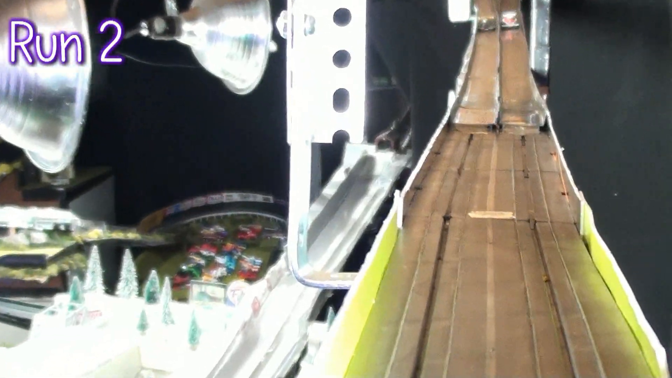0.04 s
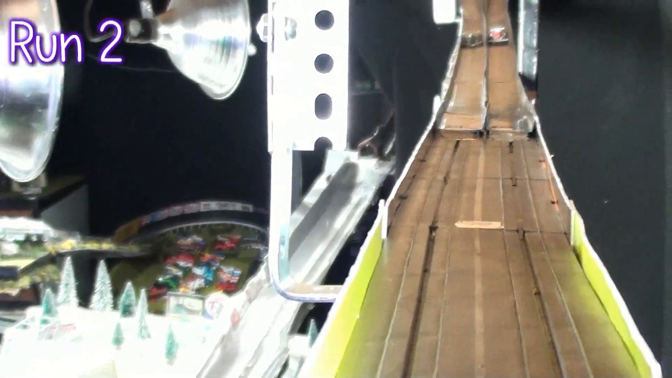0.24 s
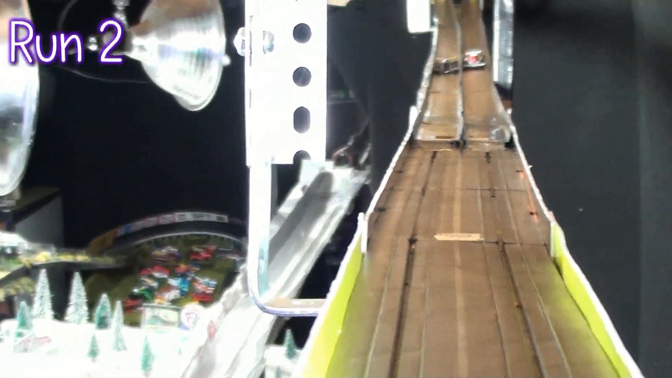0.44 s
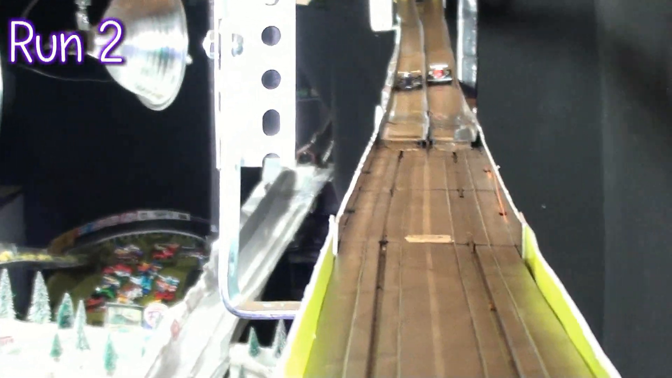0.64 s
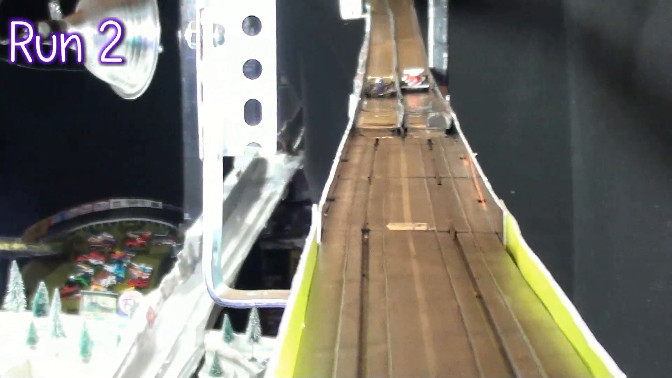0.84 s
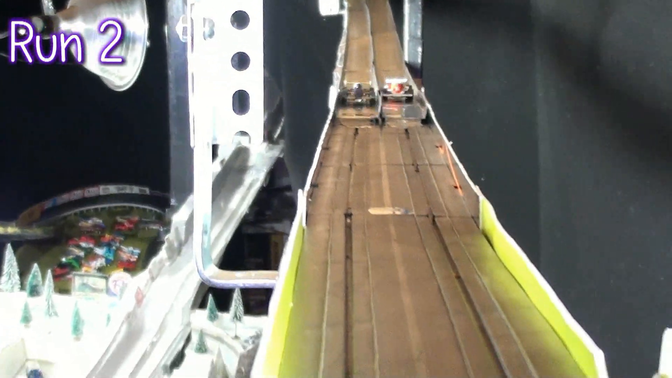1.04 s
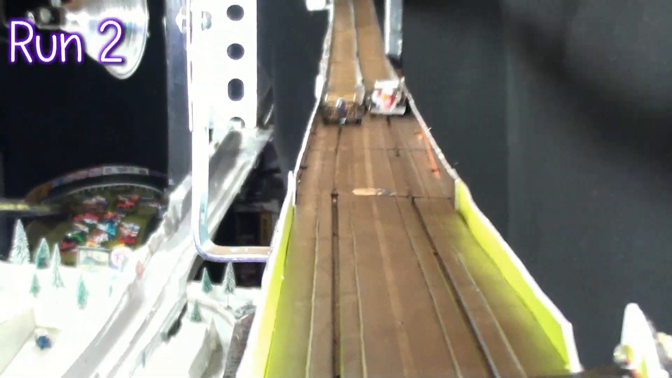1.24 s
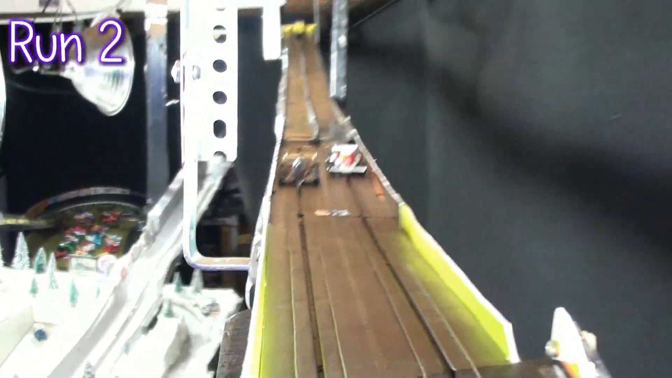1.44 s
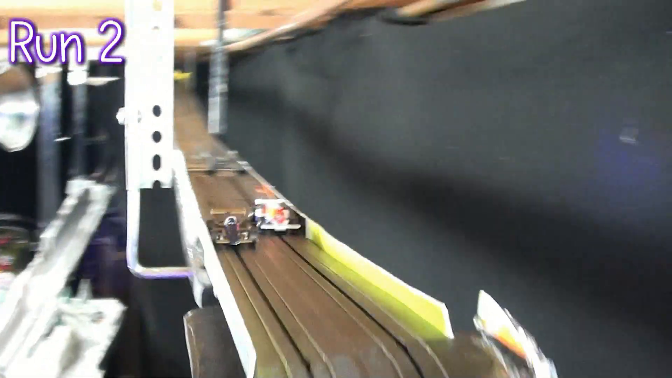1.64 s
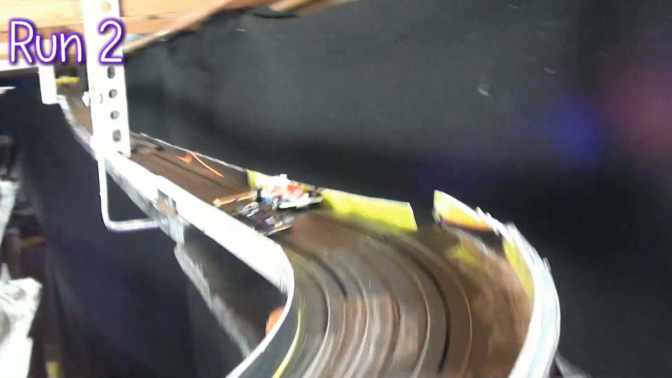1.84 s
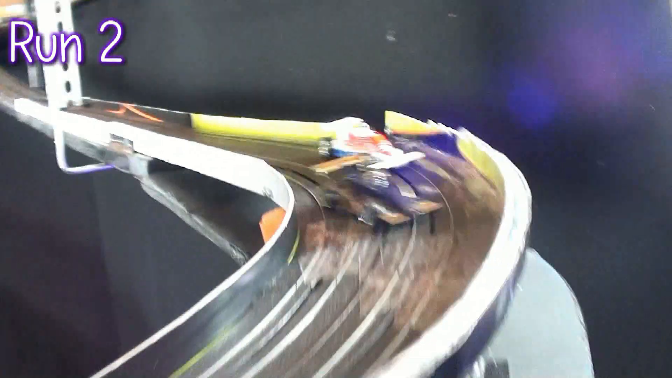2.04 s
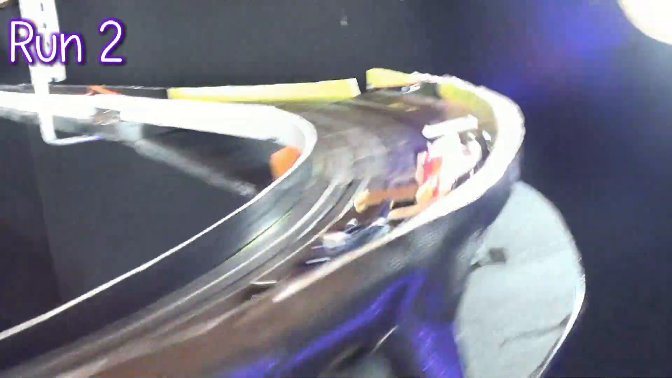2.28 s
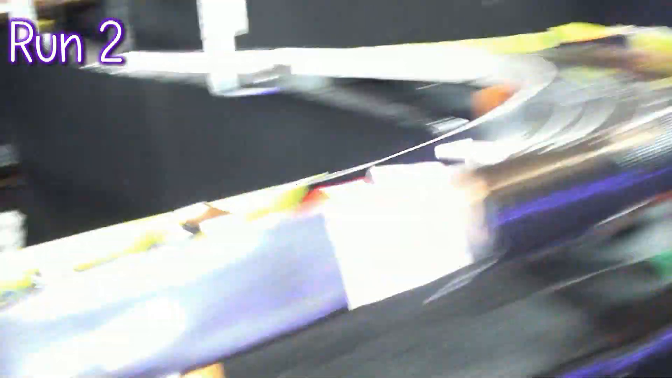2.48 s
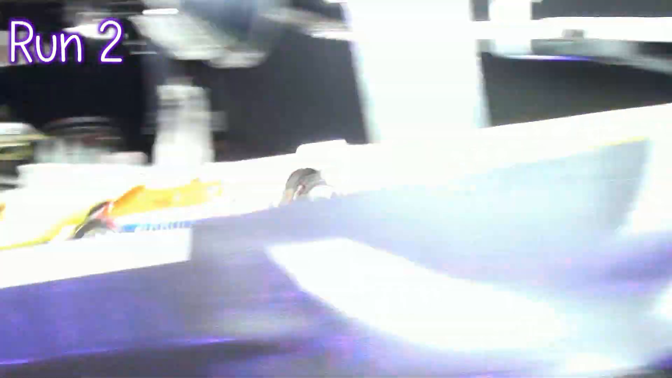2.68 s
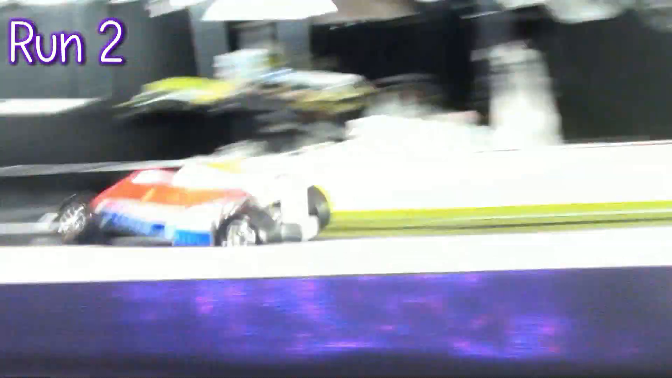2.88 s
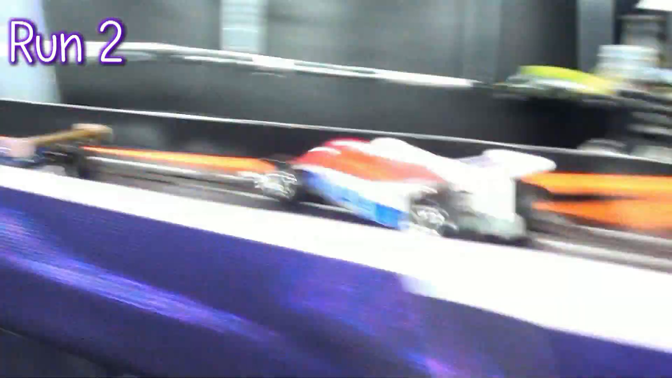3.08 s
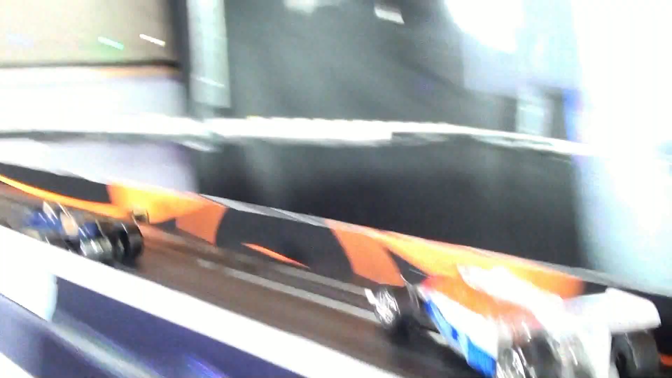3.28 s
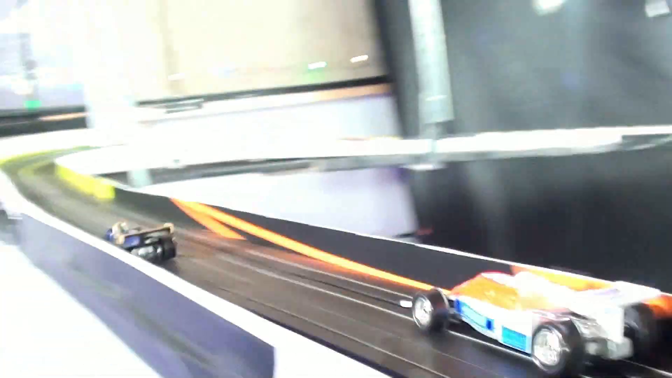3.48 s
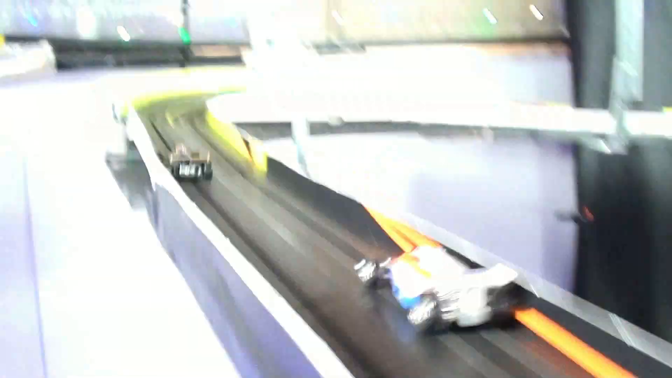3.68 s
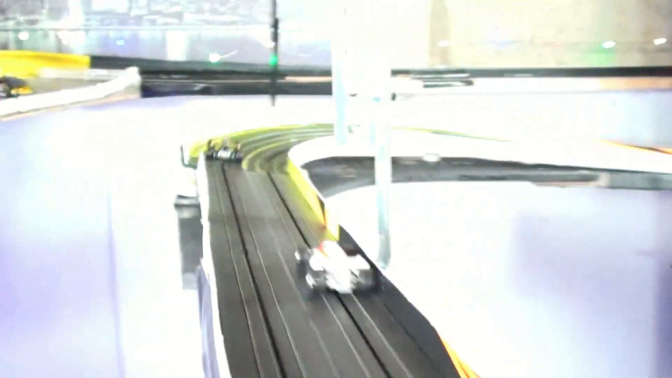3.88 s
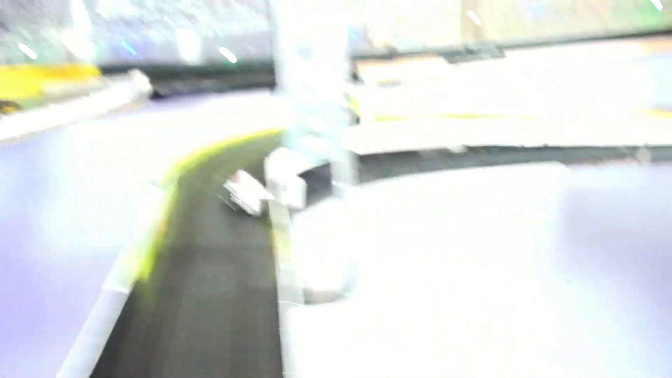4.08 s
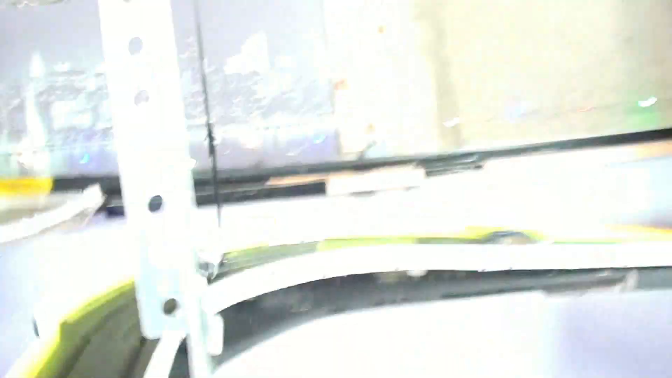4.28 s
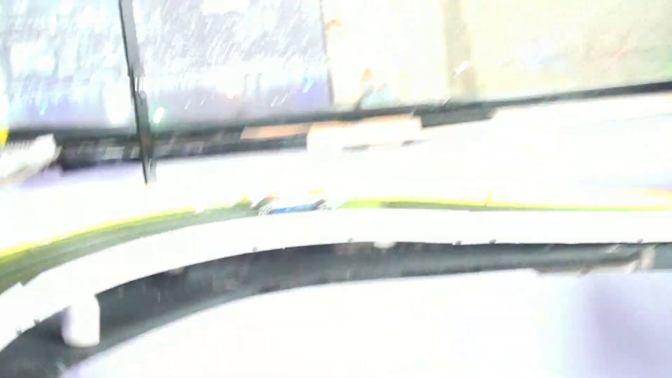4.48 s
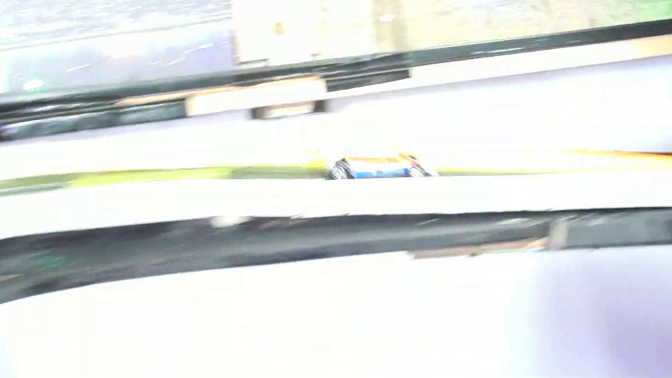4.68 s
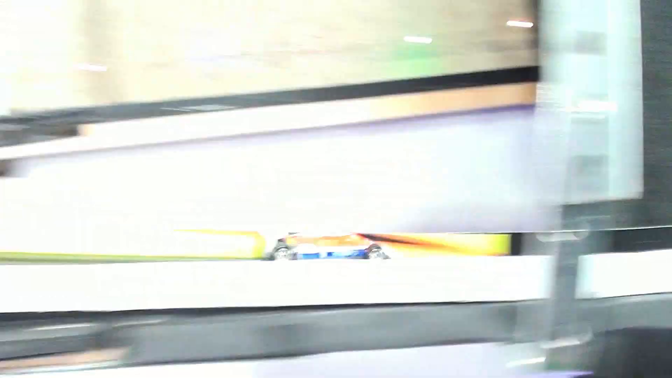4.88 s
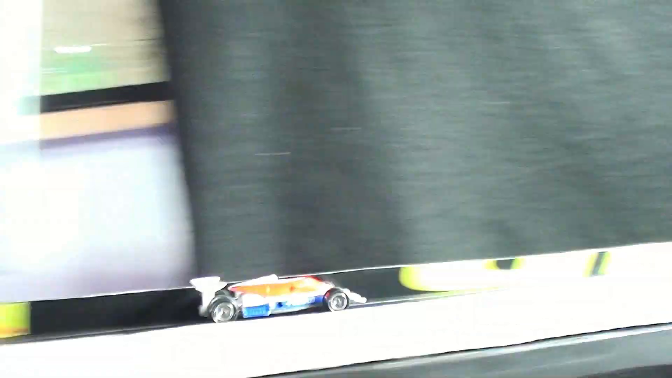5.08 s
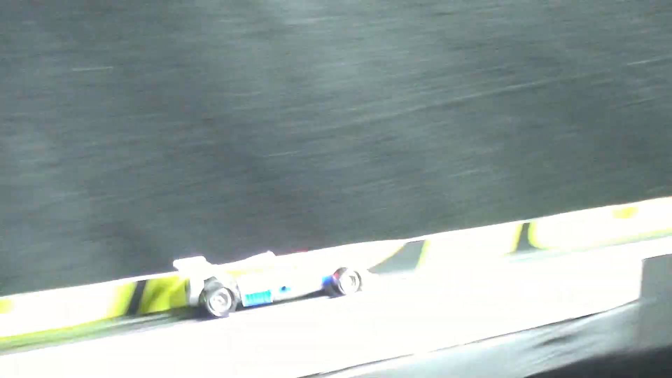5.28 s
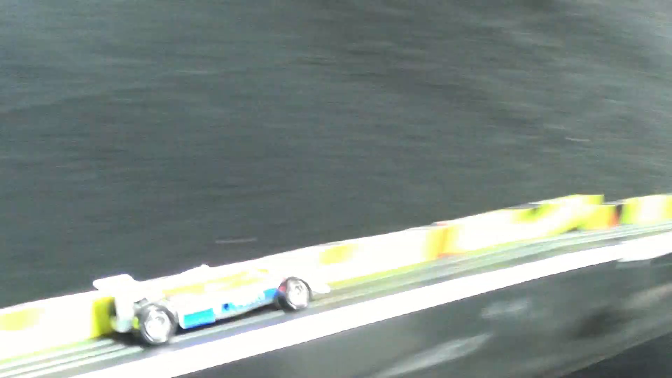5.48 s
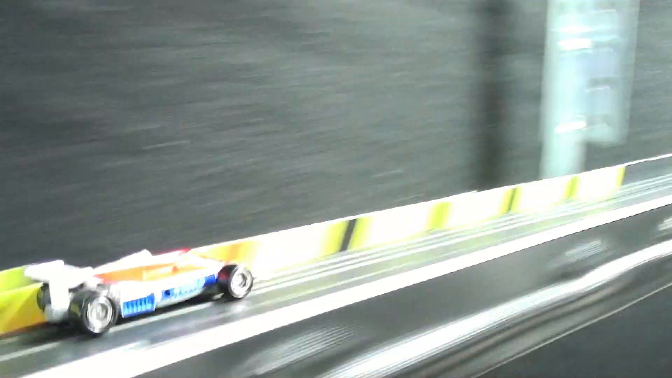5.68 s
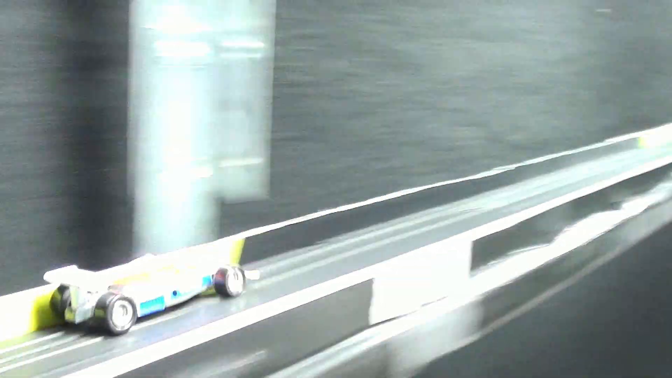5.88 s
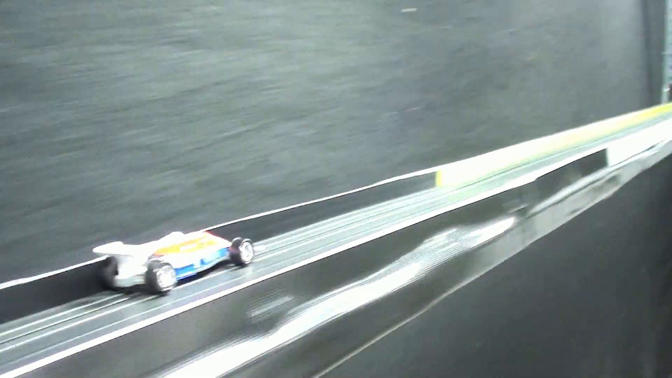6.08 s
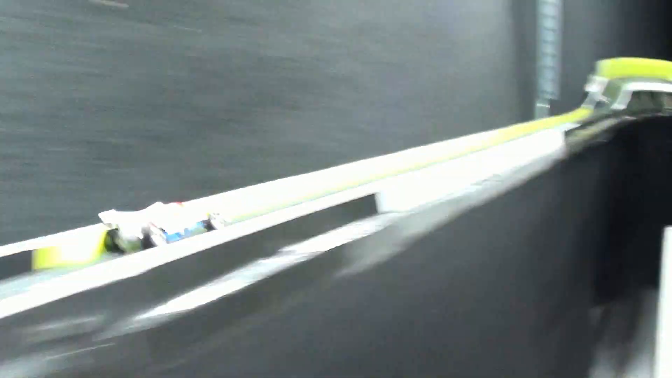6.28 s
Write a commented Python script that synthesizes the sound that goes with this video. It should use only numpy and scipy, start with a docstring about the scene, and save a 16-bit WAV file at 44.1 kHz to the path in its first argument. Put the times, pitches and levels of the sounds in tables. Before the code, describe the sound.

Two die-cast toy cars roll down a long plastic track in a small room with a low fan hum. Faint at first, the wheels swell into a close, hollow hiss with rattling axles. A flurry of sharp clacks comes in the first bend, then the rolling carries on with a few dull thuds and scattered clicks. The microphones follow close behind, in stereo.

```python
"""Two die-cast toy cars run down a long plastic track indoors, followed closely by two microphones.
Tiny bumps under the hard wheels ring each stretch of track. Loose axles rattle, most in the first bend,
where the cars clack against the rails. The track thuds on its supports and its frame grumbles,
over the low hum of a small room with a fan."""
import sys
import numpy as np
from scipy import signal
from scipy.fft import rfft, irfft, next_fast_len
from scipy.io import wavfile
from scipy.ndimage import uniform_filter1d

SR = 44100
rng = np.random.default_rng(int(sys.argv[2]) if len(sys.argv) > 2 else 0)


def transcribe(u):
    """Save the signal u as a 16-bit wav file named by the first command-line argument.

    u: samples, shape (n,) or (channels, n), limited to [-1, 1]; the rate is SR.
    q: integer samples, one column per channel.
    """
    v = np.clip(np.atleast_2d(u).T, -1, 1)
    q = np.round(v * 32767).astype(np.int16)
    wavfile.write(sys.argv[1], SR, q)


N = 279153
T = np.arange(N) / SR


def undb(db):
    """Decibels to gain."""
    return 10 ** (np.asarray(db) / 20)


def unit(x):
    """Scale to rms 1."""
    return x / np.sqrt(np.mean(x ** 2))


def curve(rows):
    """Interpolate (s, value) rows at every sample."""
    return np.interp(T, *np.transpose(rows))


def band(x, lo_hz, hi_hz, order=3):
    """Butterworth band-pass."""
    return signal.sosfilt(signal.butter(order, [lo_hz, hi_hz], "band", fs=SR, output="sos"), x)


def colour(x, points):
    """Filter by a spectrum of (Hz, dB) points."""
    hz, db = np.transpose(points)
    size = next_fast_len(len(x))
    bins_hz = np.maximum(np.arange(size // 2 + 1) * SR / size, 1)
    gain = undb(np.interp(np.log(bins_hz), np.log(hz), db))
    return irfft(rfft(x, size) * gain, size)[:len(x)]


def ring(x, modes):
    """Drive parallel (Hz, width Hz, dB) resonances of alternating sign."""
    return sum((-1) ** k * undb(db) * signal.lfilter(*signal.iirpeak(hz, hz / width_hz, fs=SR), x)
               for k, (hz, width_hz, db) in enumerate(modes))


def walk(rate_hz):
    """Smooth random drift, rms 1."""
    step = int(SR / rate_hz)
    stairs = np.repeat(rng.standard_normal(N // step + 2), step)
    return unit(uniform_filter1d(stairs, step)[:N])


def impacts(per_s, spread_db):
    """Tiny blows of random time, sign and size."""
    hit = rng.random(N) < per_s / SR
    sign = np.sign(rng.standard_normal(N))
    return hit * sign * undb(spread_db * np.clip(rng.standard_normal(N), -2, 2))


def reflections(t60_s, delay_s=0.0045):
    """Room response: dense echoes that arrive late and decay together; unit energy."""
    t = T[:SR // 2]
    echoes = rng.standard_normal(len(t)) * np.exp(-np.log(1000) * t / t60_s) * (t > delay_s)
    return echoes / np.sqrt(np.sum(echoes ** 2))


# Room rumble. Each row: time in seconds, level in dB.
ROOM_LEVEL = [(0, -50), (1.6, -49.5), (2.2, -53.5), (3.1, -54), (3.8, -52.5), (4.4, -50.5), (5.2, -59.5),
              (6.3, -61)]
# Each row: frequency in Hz, gain in dB.
ROOM_SPECTRUM = [(15, -66), (25, -50), (41, -22), (130, 0), (178, 1.5), (265, -15.5), (302, -8.5),
                 (489, -15.5), (589, -13.5), (623, -16.5), (750, -12.5), (980, -34), (1650, -120)]
# Each row: frequency in Hz, initial rms level in dB, fade time in seconds.
FAN_TONES = [(376, -67, 8.7), (827, -61.5, 1.8)]


def room_hum(swell_db=1, waver_hz=5):
    """Air rumble and wavering fan tones, which fade as the fan is left behind."""
    level_db = curve(ROOM_LEVEL)
    air = unit(colour(rng.standard_normal(N), ROOM_SPECTRUM)) * undb(level_db + swell_db * walk(6.7))
    fan = 0
    for hz, db, fade_s in FAN_TONES:
        phase = 2 * np.pi * np.cumsum(hz + waver_hz * walk(16)) / SR
        fan += undb(db) * np.exp(-(T / fade_s) ** 4) * np.sqrt(2) * np.sin(phase)
    return air + fan * undb(level_db - level_db[0])


# Each row: time in seconds, level in dB.
HANDLING_LEVEL = [(0, -56), (1.5, -62.5), (2.4, -59), (3.3, -91), (4.2, -65), (5.5, -59), (6.3, -59)]


def handling():
    """Carrying the microphones makes a soft, low rumble."""
    rumble = band(rng.standard_normal(N), 85, 101, order=1)
    return undb(curve(HANDLING_LEVEL)) * unit(band(rumble, 25, 150, order=2))


# Each row: time in seconds, level in dB.
FRAME_LEVEL = [(0, -55), (1.2, -58.5), (1.35, -48), (1.65, -56), (2.15, -56), (2.35, -49.5), (2.55, -55.5),
               (2.75, -46.5), (3.0, -52.5), (3.7, -51.5), (3.97, -61), (4.15, -52), (4.75, -53), (5.1, -51),
               (5.6, -54), (5.9, -48), (6.15, -55), (6.33, -47.5)]


def frame_grumble():
    """The frame under the track grumbles faintly."""
    return undb(curve(FRAME_LEVEL)) * unit(band(impacts(2000, 3.7), 140, 625, order=2))


# Each row: start in seconds, level in dB, pitch in Hz.
THUDS = [(2.719, -42, 348), (3.34, -33.5, 288), (3.40, -34.5, 240), (3.468, -37.5, 184), (3.541, -39, 135),
         (4.22, -39, 95), (4.279, -37, 188), (4.375, -36, 275), (5.771, -32.5, 204)]


def support_thuds(attack_s=0.0047, t60_s=0.11, overtone_ratio=1.45, overtone_db=-4):
    """The cars' weight bumps the track on its supports, which answer with two dull modes."""
    out, t = np.zeros(N + SR), T[:SR // 3]
    envelope = (1 - np.exp(-t / attack_s)) * np.exp(-np.log(1000) * t / t60_s)
    for start_s, db, hz in THUDS:
        phase = 2 * np.pi * hz * t
        modes = np.sin(phase) + undb(overtone_db) * np.sin(overtone_ratio * phase)
        start = int(start_s * SR)
        out[start:start + len(t)] += undb(db) * modes * envelope
    return out[:N]


# Each row: frequency in Hz, width in Hz, gain in dB.
RAMP_MODES = [(1934, 100, -4), (2460, 340, -6), (3100, 430, -3), (3620, 670, -6.5)]
# Each row: time in seconds, level in dB.
RAMP_RING_LEVEL = [(0, -69), (.95, -44.5), (1.25, -52), (1.5, -32), (1.9, -28.5), (2.1, -56), (2.4, -82)]


def ramp_ring():
    """The wheels excite narrow resonances of the ramp and its run-out."""
    modes = ring(impacts(5000, 3.6), RAMP_MODES)
    return undb(curve(RAMP_RING_LEVEL)) * unit(ring(modes, [(2400, 3700, 0)]))


# Each row: time in seconds, level in dB.
WHISTLE_LEVEL = [(0, -63), (.4, -63), (.7, -62), (1.0, -54.5), (1.3, -80), (1.6, -94)]


def axle_whistle(hz=6280, width_hz=260):
    """A dry axle whistles thinly."""
    return undb(curve(WHISTLE_LEVEL)) * unit(ring(impacts(5500, 1.6), [(hz, width_hz, 0)]))


def rail_scrape(middle_s=3.37, half_s=0.083, hz=12450, width_hz=1300, level_db=-45):
    """The nearest car brushes the rail: a brief, thin sizzle of stick and slip."""
    mode = [(hz, width_hz, 0)]
    sizzle = unit(ring(ring(impacts(2500, 4), mode), mode))
    return undb(level_db) * np.exp(-((T - middle_s) / half_s) ** 4) * sizzle


# Each row: middle in seconds, half-length in seconds, frequency in Hz, width in Hz, level in dB.
SPANS = [(0.414, 0.066, 2090, 600, -49), (1.1, 0.16, 1970, 130, -51), (1.505, 0.15, 3680, 800, -29),
         (1.76, 0.31, 2150, 398, -33), (1.83, 0.095, 2860, 1010, -34), (1.9, 0.24, 4200, 1000, -32),
         (2.437, 0.037, 1160, 400, -38), (2.58, 0.1, 2920, 800, -34), (2.75, 0.13, 1080, 350, -38.5),
         (2.93, 0.17, 3000, 1400, -33), (3.177, 0.21, 1180, 398, -30.5), (3.244, 0.11, 2770, 600, -30),
         (3.75, 0.076, 3100, 600, -27.5), (3.775, 0.097, 1800, 500, -36), (4.017, 0.025, 1860, 500, -31),
         (4.23, 0.06, 1900, 250, -26.5), (4.254, 0.058, 1030, 298, -30), (5.15, 0.26, 2950, 596, -34.5),
         (5.153, 0.087, 1230, 300, -33), (5.207, 0.035, 1570, 220, -36), (5.36, 0.081, 1870, 450, -30.5),
         (5.55, 0.09, 1550, 200, -32.5), (5.57, 0.043, 4470, 700, -33), (5.6, 0.05, 2920, 400, -30),
         (5.608, 0.052, 1140, 298, -32), (5.812, 0.09, 2780, 300, -37), (6.064, 0.08, 1520, 200, -34),
         (6.143, 0.036, 1040, 160, -38.5), (6.296, 0.09, 1000, 180, -33)]


def hollow_spans():
    """Each hollow span of track rings in its own mode, most when the wheels are at its middle."""
    bumps = impacts(9000, 1.1)
    out = 0
    for middle_s, half_s, hz, width_hz, db in SPANS:
        mode = ring(ring(bumps, [(hz, width_hz, 0)]), [(hz, 2 * width_hz, 0)])
        out += undb(db) * np.exp(-((T - middle_s) / half_s) ** 2) * unit(mode)
    return out


# Metal body and axles. Each row: frequency in Hz, width in Hz, gain in dB.
CAR_MODES = [(1900, 3500, -1), (3690, 1210, 13.5), (5700, 770, 13), (6290, 930, 13.5), (8150, 3000, 3.5),
             (10980, 2500, 1), (12100, 1770, 0), (14300, 1200, 1)]


def struck_car_modes(spread_db=2.2, detune=0.025, width_ratio=0.89):
    """Each blow meets the body at another point, which shifts and reweights its modes."""
    draws = np.clip(rng.standard_normal((len(CAR_MODES), 2)), -2, 2)
    return [(hz * (1 + detune * shift), width_hz * width_ratio, db + spread_db * weight)
            for (hz, width_hz, db), (shift, weight) in zip(CAR_MODES, draws)]


# Each row: start in seconds, rms level during contact in dB, contact time in seconds, treble gain in dB.
CLACKS = [(0.3545, -51, 0.004, 12), (0.391, -48, 0.016, 3), (0.425, -52, 0.013, 4),
          (0.7495, -40.5, 0.006, 10), (0.782, -44, 0.006, -10), (0.8175, -36, 0.002, -4),
          (0.822, -42, 0.008, 9), (1.1306, -50, 0.01, 12), (1.2715, -33, 0.011, 2), (1.294, -39, 0.006, -5),
          (1.3099, -25.5, 0.0085, -4), (1.3253, -27.5, 0.002, 3), (1.336, -29.5, 0.0062, -5),
          (1.427, -28, 0.007, -9), (1.736, -23.5, 0.003, -12), (1.746, -27, 0.003, -12),
          (2.0434, -29.5, 0.0026, -3), (2.0825, -31, 0.008, 4), (2.145, -30, 0.0027, 1),
          (2.154, -29, 0.0016, 2), (2.1702, -30, 0.005, -1), (2.183, -26, 0.0042, 6),
          (2.191, -28.5, 0.007, -3), (2.2045, -35, 0.003, 1), (2.2164, -26.5, 0.0046, 2),
          (2.225, -29, 0.004, -3), (2.233, -25, 0.0022, 5), (2.2452, -27, 0.0035, 0),
          (2.2656, -24.5, 0.0024, 1), (2.2767, -28.5, 0.009, 5), (2.295, -24.5, 0.0045, 2),
          (2.307, -31, 0.004, -9), (2.3235, -28.5, 0.011, -5), (2.3473, -25.5, 0.01, -3),
          (2.375, -26, 0.0069, -8), (2.387, -27.5, 0.01, 0), (2.401, -32, 0.007, -9),
          (2.417, -27.5, 0.0058, -2), (2.4273, -26, 0.012, 0), (2.446, -27.5, 0.0091, -5),
          (2.4584, -27.5, 0.01, -2), (2.4692, -24.5, 0.008, -2), (2.4955, -28.5, 0.0033, -14),
          (2.5073, -27.5, 0.0097, -8), (2.524, -27.5, 0.0071, -9), (4.338, -26, 0.003, -6),
          (4.369, -26, 0.005, -1), (4.39, -30, 0.004, -1), (4.408, -31, 0.002, 1), (4.6315, -30, 0.003, -3),
          (4.859, -30, 0.004, -2), (4.922, -28, 0.002, -2)]


def clacks(tick_db=11, attack_s=0.00023, sag_s=0.03, release_s=0.0012, ring_db=-15, ring_s=0.0097):
    """The cars hit joints, rails and each other: a tick, a judder while touching, then a faint ring."""
    out, t = np.zeros(N + SR), T[:SR // 8]
    lead = SR // 100  # room for the filter's pre-ring
    for start_s, db, contact_s, treble_db in CLACKS:
        press = np.exp(-t / sag_s - np.maximum(t - contact_s, 0) / release_s)
        envelope = (press + undb(ring_db) * np.exp(-t / ring_s)) * (1 - np.exp(-t / attack_s))
        judder = rng.standard_normal(len(t)) * envelope
        judder[0] += undb(tick_db)
        body = ring(np.pad(judder, (lead, 0)), struck_car_modes())
        track_spectrum = [(450, -3), (1300, 5), (3600, -1.5), (12500, treble_db), (15500, treble_db - 11)]
        hit = colour(body, track_spectrum)
        start, touch = int(start_s * SR) - lead, int(contact_s * SR)
        out[start:start + len(hit)] += undb(db) * hit / np.std(hit[lead:lead + touch])
    return out[:N]


# Each row: landing in seconds, air time in seconds.
SKIPS = [(1.728, 0.024), (2.375, 0.011), (2.4955, 0.0071), (4.713, 0.031), (5.268, 0.018)]


def wheel_lift_db(skip_db=-7, hop_db=-2, hop_s=0.013, hard_clack_db=-30.5, landing_s=0.0015):
    """The rolling dips while the wheels are in the air: in skips, and in a hop before each hard clack."""
    hops = [(land_s, hop_s, hop_db) for land_s, db, _, _ in CLACKS if db > hard_clack_db]
    skips = [(land_s, air_s, skip_db) for land_s, air_s in SKIPS]
    dip_db = np.zeros(N)
    for land_s, air_s, depth_db in hops + skips:
        land, air = int(land_s * SR), int(air_s * SR)
        dip_db[land - air:land] += depth_db * np.sqrt(np.arange(air) / air)
    return uniform_filter1d(dip_db, int(landing_s * SR))


def wheel_contact(bounce_s=0.004, flutter_db=1.08, bend_db=2, bend_s=2.08, bend_half_s=0.12,
                  wobble_db=0.5, turn_hz=57):
    """Gain from wheel pressure: bounces, harder at the first bend's rail, a wobble each turn, and lifts."""
    bounces = signal.lfilter([1], [1, -np.exp(-1 / (bounce_s * SR))], np.abs(impacts(130, 1.0)))
    in_bend = np.exp(-((T - bend_s) / bend_half_s) ** 2)
    bounce_db = (flutter_db + bend_db * in_bend) * unit(bounces - bounces.mean())
    turn_phase = 2 * np.pi * np.cumsum(turn_hz * (1 + 0.157 * walk(4.1))) / SR
    return undb(bounce_db + wobble_db * np.sin(turn_phase) + wheel_lift_db())


# Spectra of the stretches of track. Each row: frequency in Hz, relative gain in dB.
RAMP = [(350, -37), (600, -22), (845, -10.5), (1100, -11), (1600, -5), (1950, -4), (2100, -5),
        (3240, -11.5), (4330, -12), (6430, -18), (14000, -25.5)]
OPEN_DECK = [(350, -55), (600, -41), (725, -33), (887, -30), (1060, -26), (1190, -7.5), (1360, -8),
             (1520, -0.5), (1960, -2), (2600, -2), (3410, 0), (5390, -5), (7750, -5.5), (8990, -11),
             (15000, -25.5)]
FIRST_BEND = [(350, -49), (600, -10), (802, -35), (1090, -5), (1220, 6), (1390, 4), (2770, 7), (3460, 6.5),
              (5070, 4), (6780, 4.5), (14000, -13.5)]
MIDDLE_STRAIGHT = [(350, -55), (600, -25), (765, -6), (852, -30), (1130, -1.5), (1290, -12), (1440, 3),
                   (1690, 0), (2980, 2.5), (4120, 0), (4460, 0), (7650, -8.5), (12400, -24.5), (15000, -34)]
BEND_APPROACH = [(350, -57), (600, -23.5), (765, -15), (840, -23), (1040, -10), (1180, -10), (1350, -7),
                 (1910, -4), (2500, -7), (3190, -7), (4970, -10), (7450, -16), (15000, -34)]
SECOND_BEND = [(350, -59), (600, -27), (1000, -4), (1090, -12), (1180, -4), (1290, -11), (1520, 1),
               (1760, -3.5), (1910, 1), (2500, -7.5), (3700, -6), (7250, -9), (15000, -32)]
BEND_EXIT = [(350, -38), (600, -13), (807, -26), (1230, -7.5), (1460, -3.5), (1520, -3.5), (2040, -1),
             (2500, -8.5), (4340, -5.5), (7860, -10), (15000, -31)]
BACK_STRAIGHT = [(350, -33), (600, -20), (796, -19), (1400, -2), (1670, 0), (2020, 1.5), (2400, -4.5),
                 (3800, -1), (5460, -7), (7750, -8), (15000, -34)]
LAST_STRAIGHT = [(350, -59), (600, -24), (687, -52), (988, -4), (1290, -1.5), (1520, 4.5), (2070, 2),
                 (2370, -3.5), (2860, 3), (3650, -2), (4340, -1), (4970, -3.5), (7450, -4.5), (9110, -12),
                 (15000, -40)]
# Each row: arrival in seconds, spectrum, rattle offset in dB, axle ticks per second, boom offset in dB.
ROUTE = [(0, RAMP, -25, 500, -7.5), (0.72, RAMP, -2, 590, -6), (0.87, RAMP, -24, 500, -17),
         (1.13, RAMP, -4, 420, -36), (1.27, OPEN_DECK, -14, 1000, -16.5), (1.85, OPEN_DECK, -3, 700, -17),
         (2.052, FIRST_BEND, 1.5, 430, -19), (2.26, FIRST_BEND, -5, 300, -9.5),
         (2.52, MIDDLE_STRAIGHT, -6.5, 1000, -18.5), (3.32, MIDDLE_STRAIGHT, -4, 1000, -13.5),
         (3.52, BEND_APPROACH, -6.5, 760, -23), (3.98, SECOND_BEND, -8.5, 720, -17),
         (4.34, BEND_EXIT, -5, 570, -13.5), (4.6, BACK_STRAIGHT, -29, 720, -20.5),
         (5.06, LAST_STRAIGHT, -17, 2300, -15.5), (5.28, LAST_STRAIGHT, -5.5, 1300, -16),
         (5.55, LAST_STRAIGHT, -4.5, 1600, -11), (5.92, LAST_STRAIGHT, -2, 1700, -15.5)]
ARRIVALS_S, TRACK_SPECTRA, RATTLE_DB, TICKS_PER_S, BOOM_DB = zip(*ROUTE)


def along_route(values, blend_s=0.097):
    """One value per stretch of track, blended as the cars cross the joints."""
    stretch = np.searchsorted(ARRIVALS_S[1:], T)
    return uniform_filter1d(np.array(values, float)[stretch], int(blend_s * SR))


def floor_boom(wheel_db, hz=1000, width_hz=420, waver_db=0.9):
    """The track floor flexes in its lowest mode, more on slack stretches, wavering between supports."""
    level_db = wheel_db + along_route(BOOM_DB) + waver_db * walk(9)
    mode = ring(impacts(3000, 7.5), [(hz, width_hz, 0)])
    return undb(level_db) * unit(band(mode, 715, 1630))


def rattle_gain(wheel_db, shake_db=-15.5, settle_s=0.093):
    """The rattle follows the rolling; each clack shakes the axles, which then settle."""
    shaken = np.zeros(N)
    for start_s, db, _, _ in CLACKS:
        start = int(start_s * SR)
        flare = undb(db + shake_db) * np.exp(-T[:N - start] / settle_s)
        shaken[start:] = np.maximum(shaken[start:], flare)
    return np.hypot(undb(wheel_db + along_route(RATTLE_DB)), shaken)


def axle_rattle(wheel_db, scrape_t60_s=0.0078, scrape_db=7):
    """Loose axles tick in their slots; each tick scrapes briefly and rings the car."""
    per_s = along_route(TICKS_PER_S)
    ticks = impacts(per_s, 3.5) / np.sqrt(per_s)
    decay = np.exp(-2 * np.log(1000) / (scrape_t60_s * SR))
    energy = signal.lfilter([1], [1, -decay], ticks ** 2 + 1e-18)
    scrape = np.sqrt(energy) * rng.standard_normal(N)
    body = ring(unit(ticks) + undb(scrape_db) * unit(scrape), CAR_MODES)
    return rattle_gain(wheel_db) * unit(band(body, 6670, 11100, order=2))


# Wheels heard from close behind. Each row: time in seconds, level in dB.
CHASE_LEVEL = [(1.44, -31.5), (1.87, -30), (2.12, -33.5), (2.22, -36), (2.5, -37), (2.56, -30.5),
               (3.21, -24.5), (3.48, -28.5), (3.69, -26), (4.29, -27.5), (4.38, -32), (5.08, -29),
               (6.11, -29.5), (6.33, -29)]


def wheel_level_db(start_db=-53.5, rise_db_per_s=6, deck_s=1.262, deck_step=0.26, swell_s=0.26):
    """The cars grow louder as they speed up and near on the ramp, then swell quickly onto the deck."""
    ramp_db = start_db + rise_db_per_s * T
    close = (T > deck_s) * np.clip(deck_step + (T - deck_s) / swell_s, 0, 1)
    return (1 - close) * ramp_db + close * curve(CHASE_LEVEL)


def rolling(bumps_per_s=11000, drift_db=3.5, drift_hz=22, mode_q=42):
    """Bumps under the wheels ring the current stretch; its modes swell and fade as the contact moves."""
    bumps = impacts(bumps_per_s, 3)
    drive = bumps.copy()
    for hz in np.geomspace(1050, 13000, num=30):
        swell = undb(drift_db * np.clip(walk(drift_hz), -2, 2)) - 1
        drive += swell * ring(bumps, [(hz, hz / mode_q, 0)])
    out = 0
    for k, spectrum in enumerate(TRACK_SPECTRA):
        share = along_route(np.arange(len(ROUTE)) == k, blend_s=0.12)
        panel = colour(drive, spectrum)
        out += share * panel / np.std(band(panel[:SR], 1070, 3750))
    return out


# Reflections that differ between the microphones. Each row: frequency in Hz, side gain in dB.
SIDE_SPECTRUM = [(60, -30), (130, -32), (250, -22), (500, -17.5), (1000, -21), (2000, -15), (4500, -15),
                 (8500, -16.5), (11000, -100)]
# Direction of the cars. Each row: time in seconds, leftward bias in dB before band weighting.
PAN = [(0.0, 2.5), (2.03, 1), (2.36, 4), (2.92, 5), (3.28, -3), (3.79, -2.5), (4.3, 5.5), (4.64, 3.5),
       (6.33, 6.5)]


def scene(roll_db=1.0, spans_db=-0.2, walls_db=-18):
    """The cars near the microphones, with soft reflections from the room; stereo."""
    wheel_db = wheel_level_db()
    wheels = undb(roll_db + wheel_db) * rolling() + axle_rattle(wheel_db)
    cars = (wheels + undb(spans_db) * hollow_spans()) * wheel_contact()
    cars += floor_boom(wheel_db) + frame_grumble() + ramp_ring() + axle_whistle()
    cars += rail_scrape() + clacks() + support_thuds()
    walls = signal.fftconvolve(band(cars, 100, 8200, order=1), reflections(t60_s=0.075))[:N]
    mid = cars + undb(walls_db) * walls + room_hum() + handling()
    side = colour(signal.fftconvolve(mid, reflections(t60_s=0.14))[:N], SIDE_SPECTRUM)
    # direction is heard mainly from 1 to 7 kHz
    directional = colour(cars, [(300, -42), (1000, -16), (7000, -7.5), (11000, -36)])
    side += (undb(curve(PAN) / 2) - 1) * directional
    return np.array([mid + side, mid - side])


def record(dry, ceiling=0.18, release_db_per_s=250, cutoff_hz=15700):
    """Instant-attack peak limiter, then a steep low-pass."""
    over_db = np.maximum(20 * np.log10(np.abs(dry).max(axis=0) / ceiling + 1e-9), 0)
    duck_db = np.maximum.accumulate(over_db + release_db_per_s * T) - release_db_per_s * T
    low_pass = signal.ellip(12, .2, 100, cutoff_hz, fs=SR, output="sos")
    return signal.sosfilt(low_pass, dry * undb(-duck_db))


dry = scene()
out = record(dry)
transcribe(out)
```